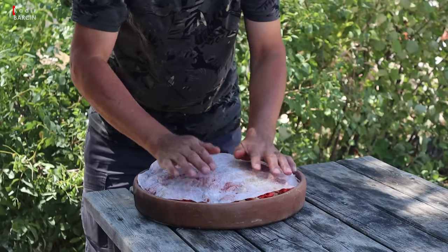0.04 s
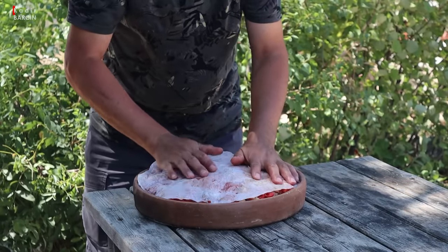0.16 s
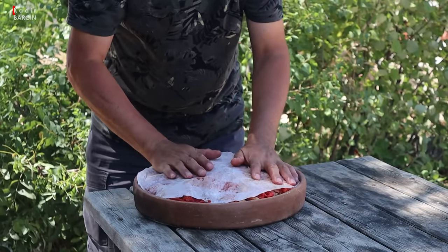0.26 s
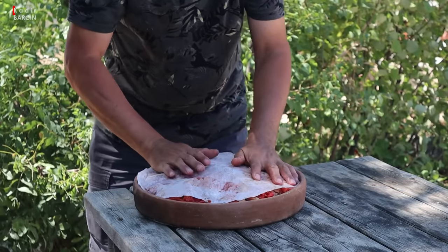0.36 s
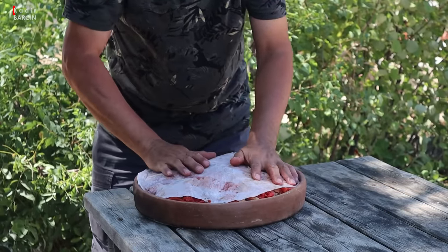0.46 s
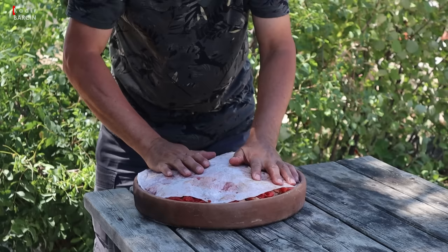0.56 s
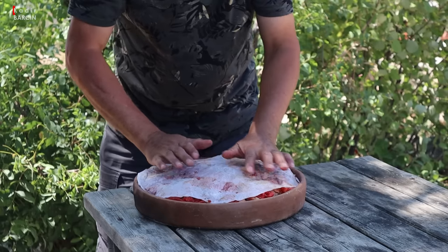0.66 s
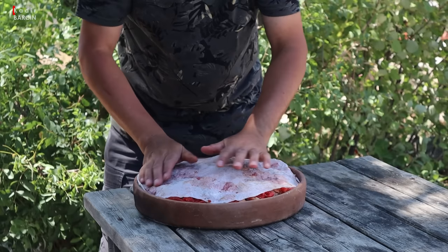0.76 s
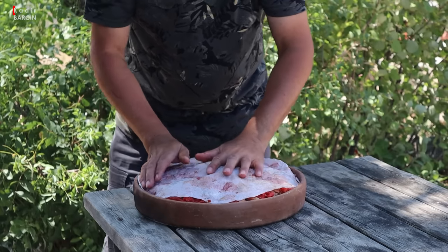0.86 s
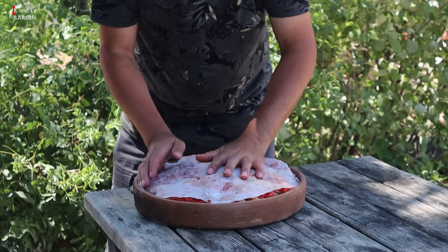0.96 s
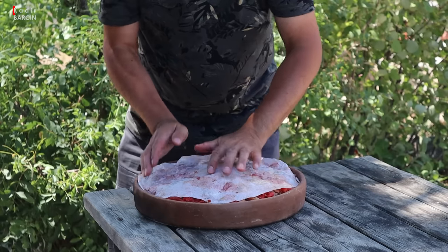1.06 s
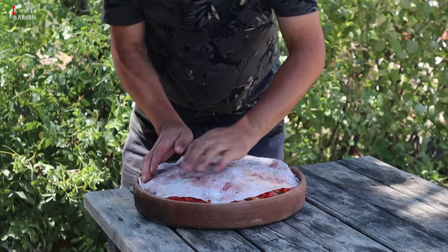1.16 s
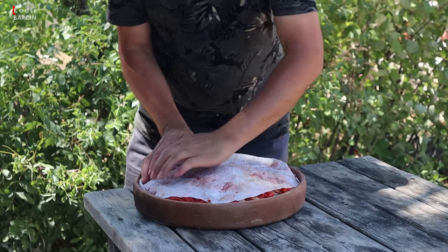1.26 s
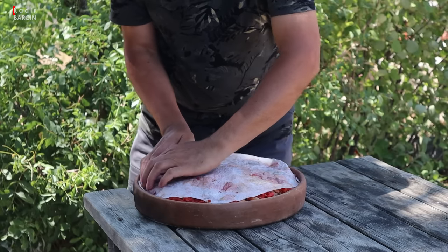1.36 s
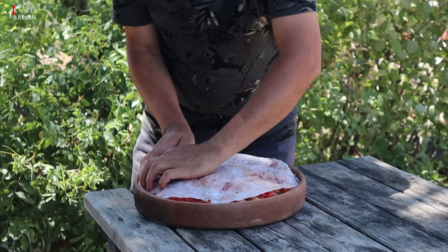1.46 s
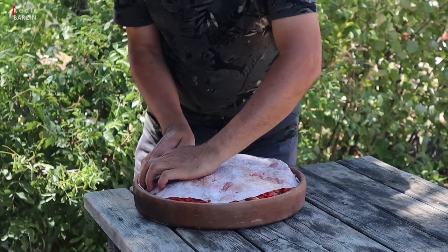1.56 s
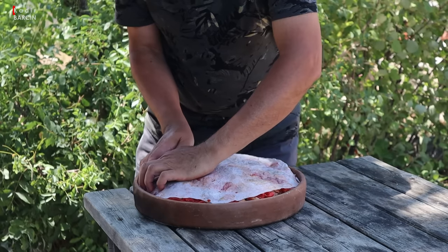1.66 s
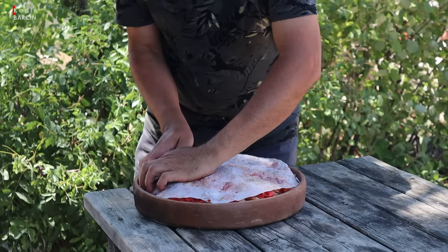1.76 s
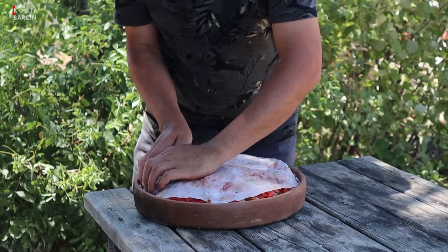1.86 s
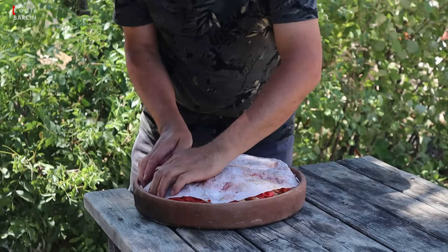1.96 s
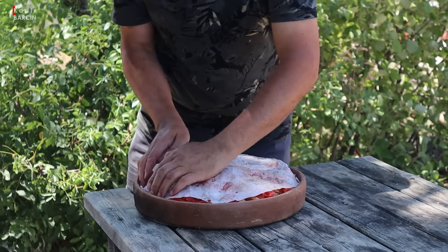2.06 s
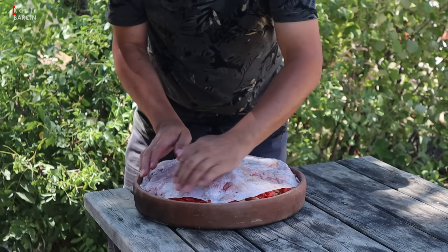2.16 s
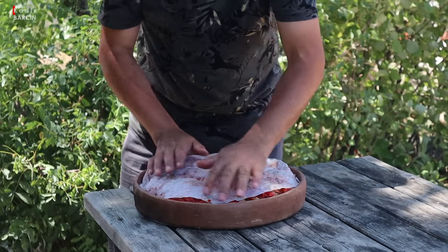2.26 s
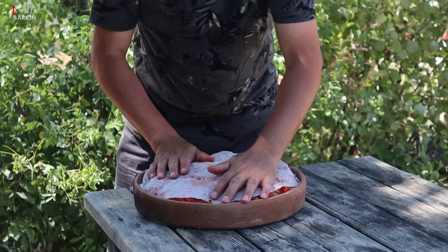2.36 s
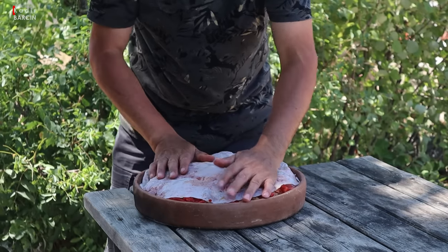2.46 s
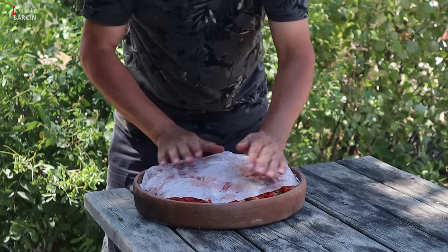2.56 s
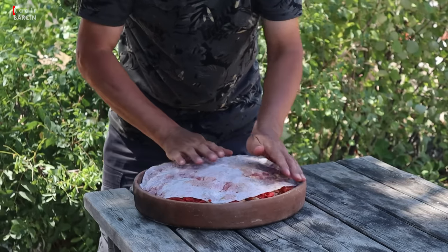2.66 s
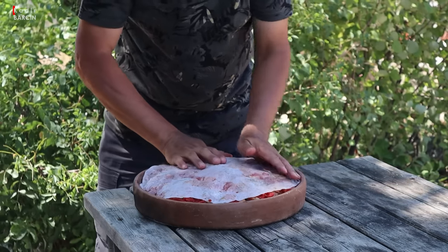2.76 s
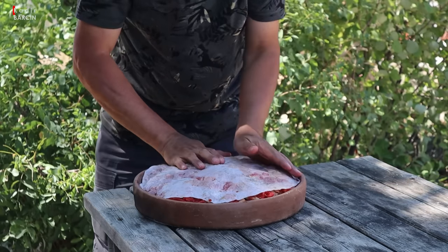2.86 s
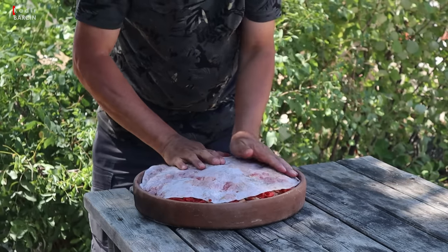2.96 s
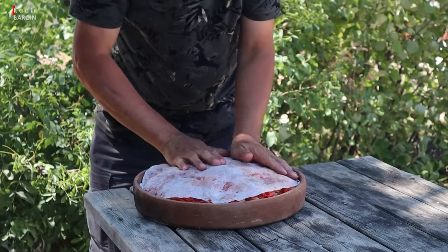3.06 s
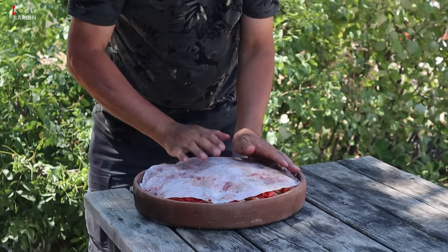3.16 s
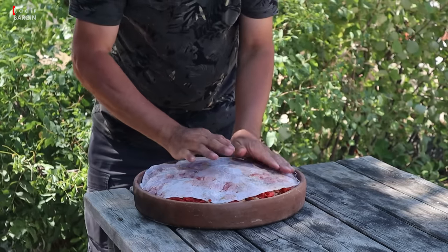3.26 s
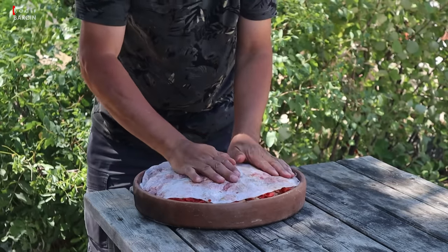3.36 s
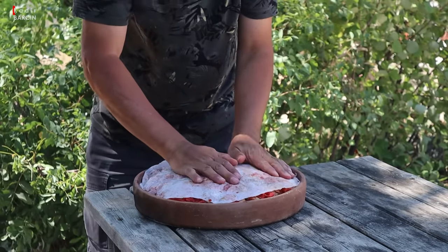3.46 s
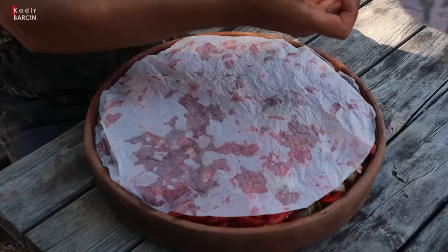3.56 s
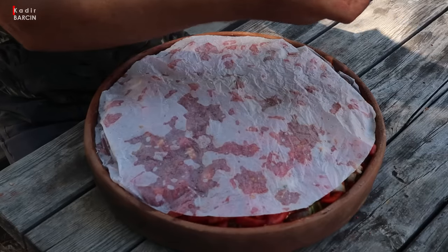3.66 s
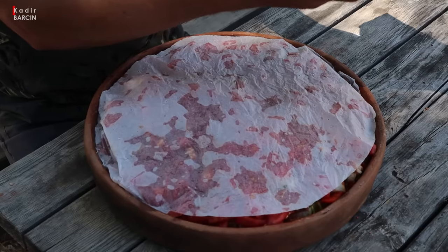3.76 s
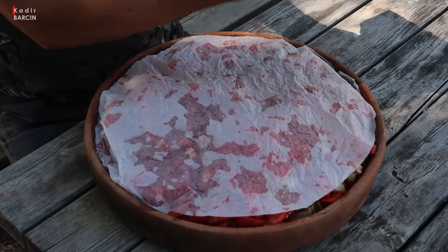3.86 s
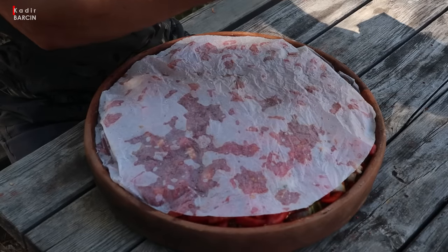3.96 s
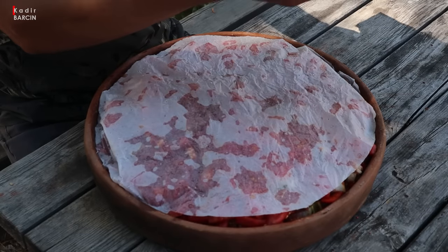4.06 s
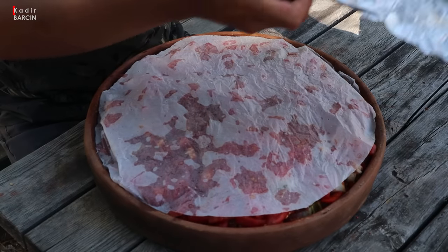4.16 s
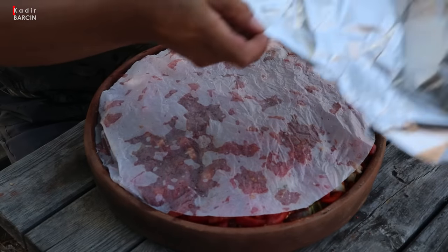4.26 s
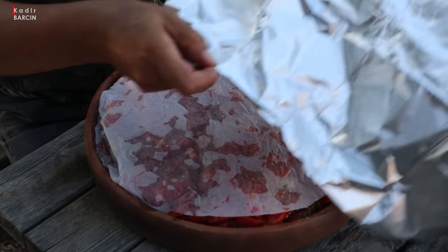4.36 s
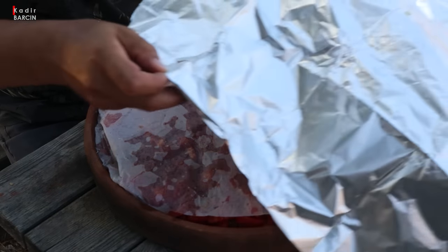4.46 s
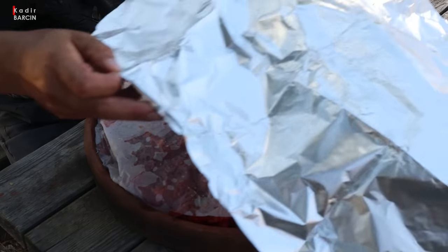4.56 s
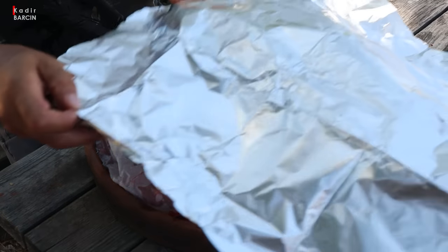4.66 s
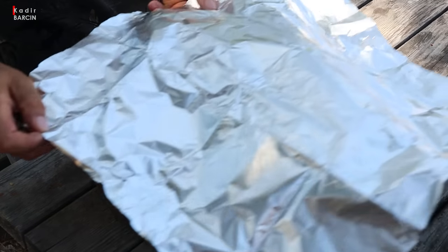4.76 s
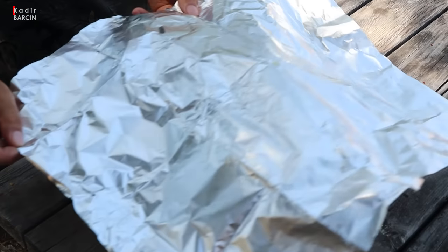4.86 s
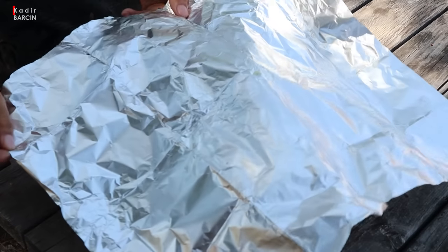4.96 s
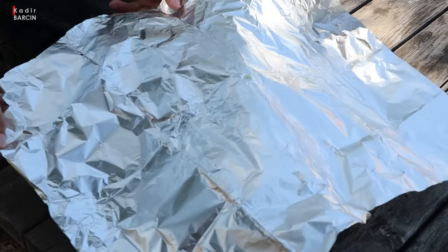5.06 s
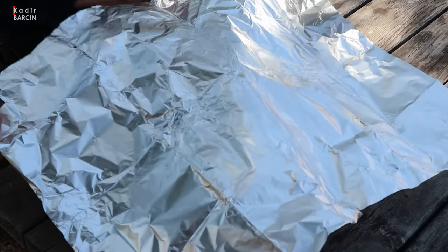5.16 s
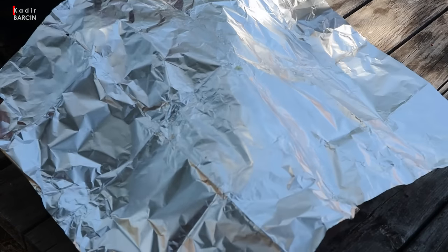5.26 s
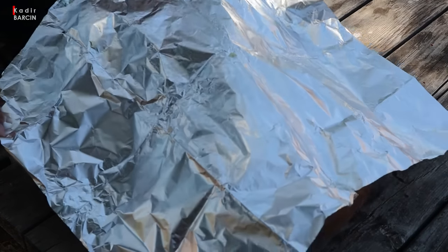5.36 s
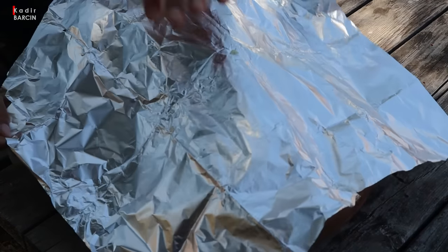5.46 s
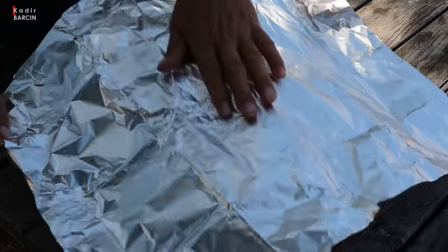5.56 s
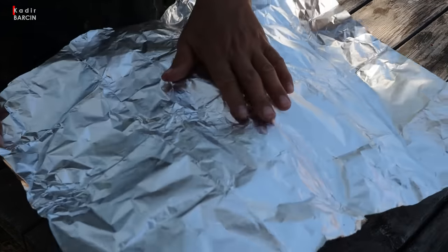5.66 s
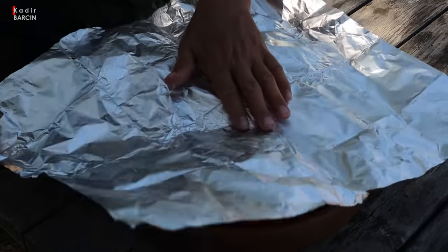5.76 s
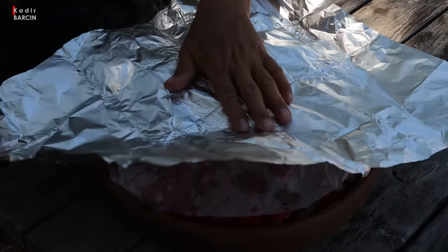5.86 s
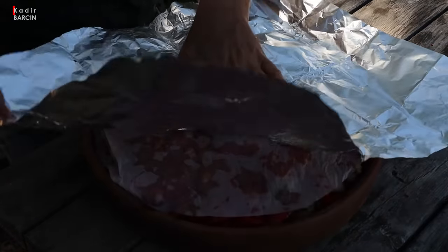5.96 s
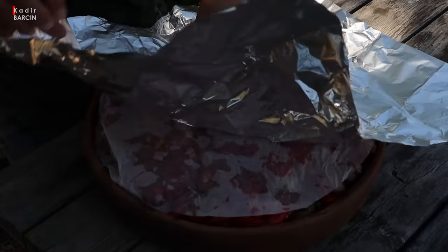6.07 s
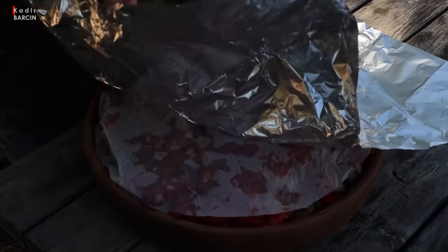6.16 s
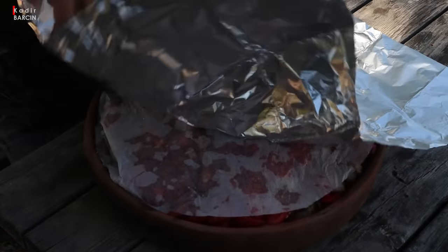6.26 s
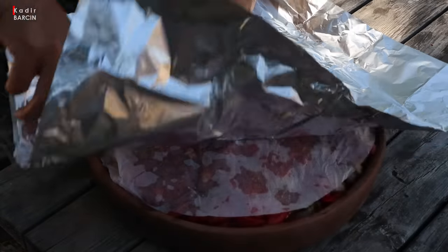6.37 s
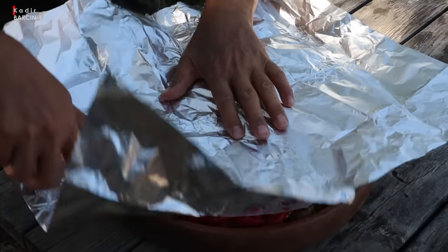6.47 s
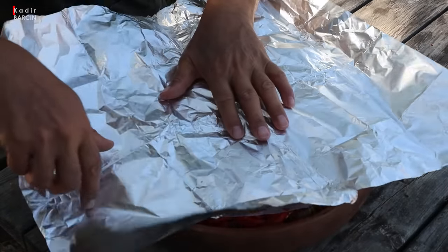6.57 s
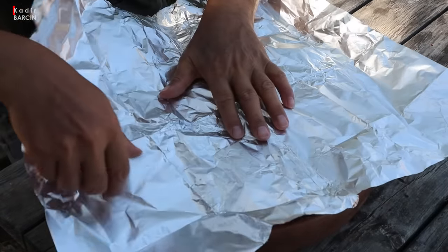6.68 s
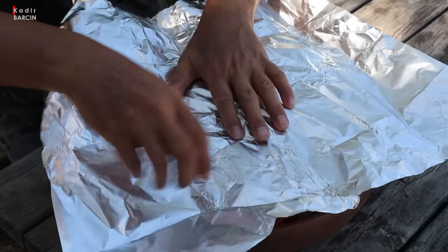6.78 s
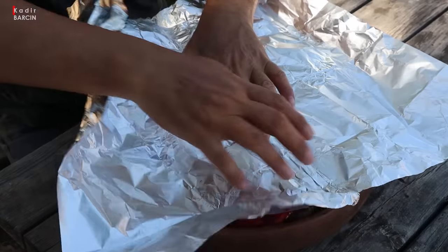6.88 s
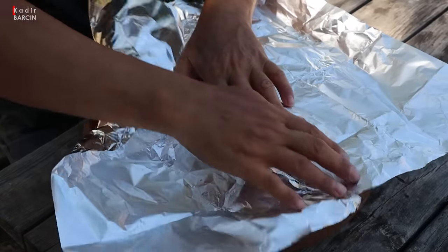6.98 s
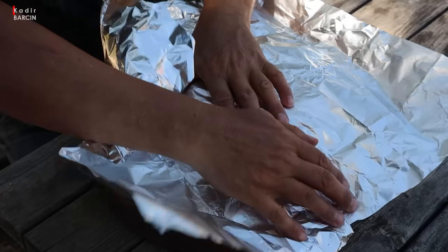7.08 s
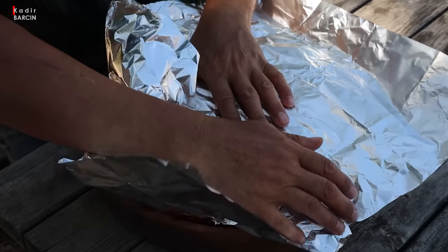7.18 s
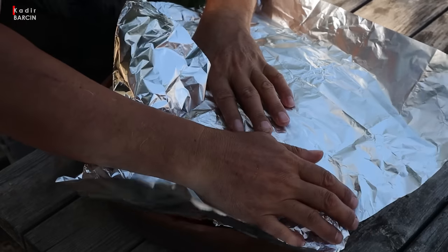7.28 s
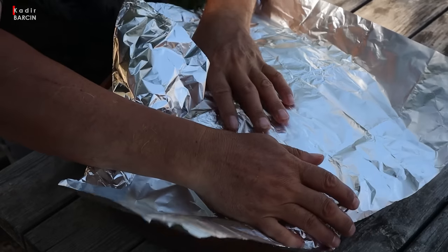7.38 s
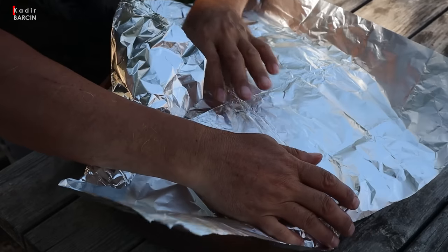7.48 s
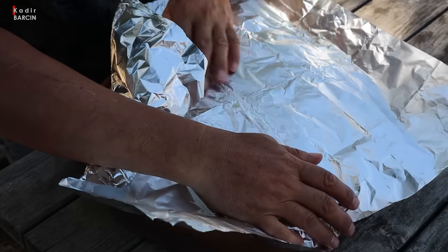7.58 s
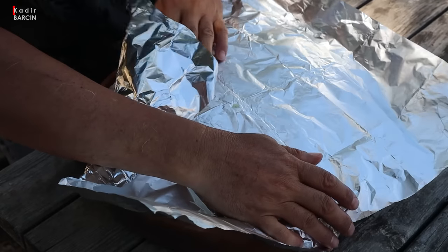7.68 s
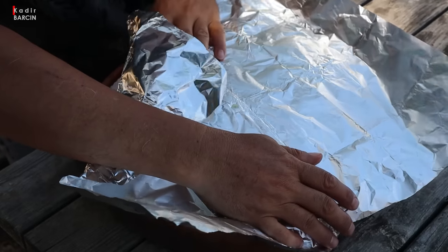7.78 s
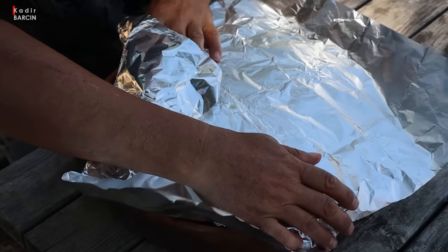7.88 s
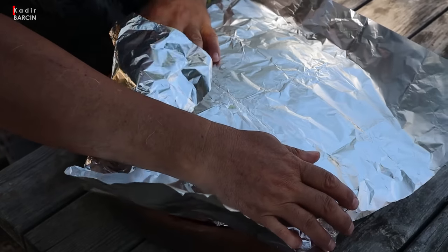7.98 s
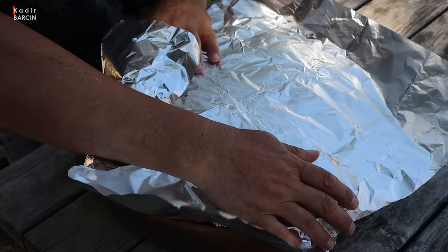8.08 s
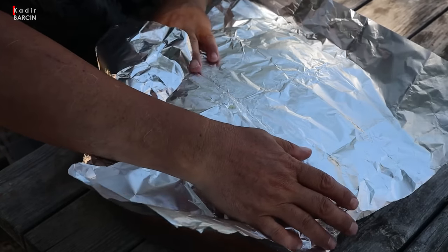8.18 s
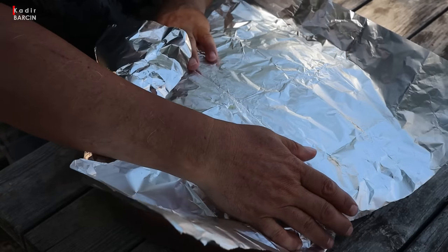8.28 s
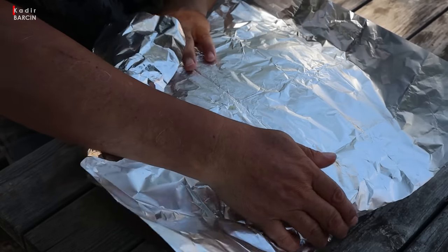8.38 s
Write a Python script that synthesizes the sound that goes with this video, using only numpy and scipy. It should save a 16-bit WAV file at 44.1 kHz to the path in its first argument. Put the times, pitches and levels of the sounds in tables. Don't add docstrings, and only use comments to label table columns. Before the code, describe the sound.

Outdoors in summer, hands pat damp paper on a clay dish with faint rustles and small ticks, while cicadas hiss and gusts thump the microphone. Abruptly the position is closer: the insect hiss jumps louder, and aluminium foil is shaken out with ringing, metallic flaps, then laid down and crumpled around the rim with sharp snaps, bright hissing creases and lower crackles.

```python
import sys
import numpy as np
from scipy import signal
from scipy.fft import rfft, irfft, next_fast_len
from scipy.io import wavfile
from scipy.ndimage import uniform_filter1d

SR = 44100
rng = np.random.default_rng(int(sys.argv[2]) if len(sys.argv) > 2 else 0)


def volts(x):
    e = np.asarray(x, float) / 20
    return 10 ** e


def store_pcm(level_fs):
    pcm = np.round(np.clip(level_fs, -1, 1) * 32767).astype(np.int16)
    wavfile.write(sys.argv[1], SR, np.atleast_2d(pcm).T)


N = 371763
TIME_S = np.arange(N) / SR
CUT_S = 3.601
FAR_VIEW = TIME_S < CUT_S


def curve(table):
    s, db = np.transpose(table)
    return np.interp(TIME_S, s, db)


def unit(x):
    return x / np.sqrt(np.mean(x ** 2))


def noise():
    return rng.standard_normal(N)


def colour(x, table, lo_hz=20, hi_hz=20000):
    size = next_fast_len(len(x))
    f = np.arange(size // 2 + 1) * SR / size + 1e-3
    hz, db = np.transpose(table)
    top_db = db[-1] if hz[-1] > 15000 else -90
    gain_db = np.interp(np.log(f), np.log(hz), db, left=-90, right=top_db)
    spectrum = rfft(x, size) * volts(gain_db)
    inside = 2 * np.sum(np.abs(spectrum[(f > lo_hz) & (f < hi_hz)]) ** 2)
    return irfft(spectrum, size)[:len(x)] * size / np.sqrt(inside)


def walk(rate_hz):
    k = int(SR / rate_hz)
    steps = np.repeat(rng.standard_normal(N // 20), k)[:N]
    return unit(uniform_filter1d(uniform_filter1d(steps, k), k))


def patchy(table, flicker_db, rate_hz, lo_hz=20, hi_hz=20000, count=6):
    total = 0
    for hz in np.geomspace(table[0][0], table[-1][0], count + 2):
        band = colour(noise(), [(hz / 2.2, -30), (hz, 0), (hz * 2.2, -30)])
        total = total + volts(flicker_db * walk(rate_hz)) * np.sqrt(hz) * band
    flat = colour(total, [(20, 0), (22000, 0)])
    return colour(flat, table, lo_hz, hi_hz)


def swells(s, db, rise_s, hold_s, fall_s, rest_db):
    step = 64
    t = np.arange(N // step + 1)[:, None] * step / SR
    rise = np.maximum(s - t, 0) / np.maximum(rise_s, 1e-3)
    fall = np.maximum(t - s - hold_s, 0) / fall_s
    power = np.sum(volts(2 * (db - 10 * (rise + fall))), axis=1)
    return 10 * np.log10(np.interp(np.arange(N), t[:, 0] * SR, power) + volts(2 * rest_db))


def crackle(rate_hz, spread_db, t60_s, bunch_db):
    starts = (rng.random(N) < 50 / SR) * rng.random(N)
    surge = signal.lfilter([1], [1, -np.exp(-1 / (.012 * SR))], starts)
    bunches = volts(bunch_db * np.minimum((surge - surge.mean()) / surge.std(), 1.5))
    sizes = volts(spread_db * np.minimum(rng.exponential(size=N), 3.8))
    clicks = (rng.random(N) < rate_hz / SR) * sizes
    power = signal.lfilter([1], [1, -volts(-120 / (t60_s * SR))], (clicks * bunches) ** 2)
    return np.sqrt(power) * noise()


def burst(hz, t60_s, octaves, grain):
    t = np.arange(len(grain)) / SR
    edges = np.clip(hz * 2 ** np.array([-octaves, octaves]), 50, 20000)
    band = signal.butter(2, edges, "band", fs=SR, output="sos")
    x = signal.sosfilt(band, grain * volts(-60 * t / t60_s))
    return x / np.max(np.abs(x))


def add(out, s, sound):
    i = int(s * SR)
    out[i:i + len(sound)] += sound[:N - i]


# f/Hz, density/dB [per Hz]
RUSTLE_SPECTRUM = [(88, -30), (150, -14.5), (400, 1.5), (540, -2), (680, 2.5), (1210, -16), (3210, -13),
                   (5200, 1)]
# f/Hz, level/dB
MACHINE_TONES = [(511.4, -72), (559.9, -54), (699.8, -59.5)]


def air():
    hum = 0
    for hz, db in MACHINE_TONES:
        sway_db, slip_rad = 1.7 * walk(5), 1.9 * walk(5)
        hum = hum + volts(db - 2.0 + sway_db) * np.sin(2 * np.pi * hz * TIME_S + slip_rad)
    return patchy(RUSTLE_SPECTRUM, 1.1, 9, 280, 2400) * volts(-51.0) + hum


# t/s, peak/dB, hold/s
GUSTS_ON_CAPSULE = [(0.0, -33, 0.25), (0.454, -39.5, 0.023), (0.618, -49, 0.17), (0.834, -38, 0.096),
                    (1.075, -33, 0.072), (1.3, -34.5, 0.062), (1.53, -38.5, 0.11), (1.72, -43.5, .08),
                    (1.973, -43, 0.11), (2.425, -44.5, 0.046), (2.672, -45, 0.15), (2.777, -40, 0.2),
                    (3.42, -42.5, .2)]
# t/s, level/dB
BREEZE_LEVEL = [
    (0, -63),
    (3.55, -60),
    (4.0, -53),
    (5.1, -56),
    (6.2, -56.5),
    (6.7, -64),
    (8.43, -65),
]


def wind():
    s, db, hold_s = np.transpose(GUSTS_ON_CAPSULE)
    gust_db = np.where(FAR_VIEW, swells(s, db, .081, hold_s, .072, -70), -90)
    flutter = walk(22.65)
    low = colour(noise(), [(15, -1.5), (35, 2.5), (80, -1.0), (130, -10.0)], 37.0, 86)
    upper = colour(noise(), [(90, -8.0), (125, 5.0), (200, -3.5), (400, -22.5)], 136, 260)
    breeze = volts(curve(BREEZE_LEVEL) + 2.3 * walk(5))
    eddies = volts(-49 + 1.26 * (gust_db + 40.5) + 1.3 * flutter) + volts(-62)
    return low * (volts(gust_db + 0.53 * flutter) + breeze) + upper * eddies


# t/s, level/dB
CHORUS_LEVELS = [
    [(0.0, -30.5), (1.05, -30.5), (1.48, -31.5), (3.58, -33)],
    [(3.62, -19.5), (3.78, -21.5), (7.05, -21.5), (8.43, -23)],
]
# f/Hz, density/dB [per Hz]
FAR_SPECTRUM = [(1760, -92), (3770, -24.5), (4090, -15), (4500, -9), (6490, -3.5), (8150, -5.5),
                (9420, -19), (15600, -58)]
CLOSE_SPECTRUM = [(3200, -16), (4250, -3.5), (4580, 2.5), (4950, 0), (6500, 7), (8600, -2), (10500, -13.5),
                  (15750, -23)]
# t/s, level/dB
THROB_LEVEL = [
    (0, -28.5),
    (1.2, -29),
    (1.45, -34),
    (1.7, -30.5),
    (2.5, -36),
    (3.58, -35),
]


def cicada_chorus():
    far = patchy(FAR_SPECTRUM, 0.82, 8.65, 5500, 6960, count=9)
    close = patchy(CLOSE_SPECTRUM, 1.42, 11, 3900, 9000, count=9)
    before, after = CHORUS_LEVELS
    level_db = np.where(FAR_VIEW, curve(before), curve(after))
    level_db = curve(np.vstack([before, after])) if len(before) else level_db
    chorus = np.where(FAR_VIEW, far, close) * volts(level_db + 0.08)
    throb_hz = 5.45
    throb = (.5 + .5 * np.cos(2 * np.pi * throb_hz * (TIME_S - .055))) ** 1.3
    throbber = colour(noise(), [(4900, -20), (5500, 0), (5900, -2), (7600, -5), (8600, -16)])
    return chorus + FAR_VIEW * throbber * throb * volts(curve(THROB_LEVEL))


# t/s, level/dB
SINGER_LEVEL = [
    (0, -41.5),
    (1.055, -40.5),
    (1.068, -53),
    (1.145, -54),
    (1.155, -46),
    (1.27, -44),
    (2.3, -44.5),
    (3.58, -42),
]
# f/Hz, density/dB [per Hz]
SINGER_SPECTRUM = [(5180, -38), (8800, -9.5), (10000, -7.5), (11200, -10.5), (11600, -11), (12900, -17.5),
                   (13700, -24), (15600, -30)]
# delay/ms, share [ratio]
SINGER_ECHOES = [(1.4, .4), (3.1, .22), (3.63, .18), (7.3, .2), (7.6, .5)]
# t/s, level/dB
BELLY_LEVEL = [
    (0, -70),
    (1.22, -70),
    (1.3, -37.5),
    (2.1, -39),
    (3.58, -41.5),
]


def near_cicada():
    buckle_hz = 186.4
    phase = np.cumsum(buckle_hz * (1 + 0.0034 * walk(8.1))) / SR % 1
    ribs = noise() * (.7 + np.exp(-phase / .3))
    heard = ribs.copy()
    for delay_ms, share in SINGER_ECHOES:
        heard += share * np.roll(ribs, round(delay_ms * SR / 1000))
    belly_ms, belly_feedback = .726, .78
    comb = np.r_[1, np.zeros(round(belly_ms * SR / 1000) - 1), -belly_feedback]
    hollow = signal.lfilter([1], comb, heard)
    singer = colour(heard, SINGER_SPECTRUM, 9970, 10780) * volts(curve(SINGER_LEVEL) + 4.5)
    belly = colour(hollow, [(9200, -25), (9500, 1), (11150, 0), (11300, -9), (12600, -9), (13300, -25)])
    return FAR_VIEW * (singer + belly * volts(curve(BELLY_LEVEL)))


# f/Hz, density/dB [per Hz]
PAPER_SPECTRUM = [(400, -17), (900, -3), (1600, 1), (3000, 3), (6000, -1.5), (15000, -10)]
# t/s, peak/dB, hold/s
PALM_STROKES = [(0.0, -53, 0.05), (0.2, -47, 0.12), (0.456, -57, 0.2), (0.862, -42, 0.0074),
                (0.907, -41.5, 0.14), (1.074, -40, 0.0051), (1.247, -41, 0.03), (1.381, -40.5, .0),
                (1.505, -56, 0.13), (1.693, -43.5, 0.034), (1.856, -46, 0.027), (2.046, -39.5, 0.017),
                (2.15, -54, 0.033), (2.38, -48.5, 0.11), (2.785, -46.5, 0.05), (2.897, -50, 0.065),
                (3.08, -40.5, 0.0066), (3.225, -47.5, 0), (3.392, -45, 0.0045), (3.45, -48.5, 0.1)]
# t/s, peak/dB, f/Hz
PAPER_TICKS = [(0.0533, -41, 1260), (0.2004, -28, 3330), (0.2488, -39, 2290), (0.3192, -34, 3250),
               (0.4988, -35, 2560), (0.5641, -36, 2440), (0.6424, -41, 1410), (0.6898, -33, 2480),
               (0.8609, -27, 1670), (0.8824, -30, 2400), (0.902, -27, 2410), (0.9727, -38, 2660),
               (1.0026, -26, 2070), (1.069, -27.5, 1730), (1.2447, -26, 2800), (1.3124, -28.5, 2710),
               (1.477, -27, 2310), (1.6217, -37, 2820), (1.694, -24, 3660), (1.8796, -37, 2680),
               (2.0376, -26, 2330), (2.1097, -38, 1060), (2.3496, -42, 2570), (2.397, -30, 3330),
               (2.4553, -33, 1900), (2.7816, -35, 3770), (2.8255, -29, 1250), (2.8779, -26.5, 1430),
               (3.0854, -35, 1920), (3.1707, -33, 2920), (3.2221, -32, 3490), (3.3882, -39, 1390),
               (3.4598, -30, 1480), (3.5064, -33, 3030), (3.5294, -37.5, 3420)]
# t/s, peak/dB
EDGE_TICKS = [
    (0.2952, -37),
    (0.3346, -54),
    (1.275, -35),
    (1.3803, -22),
    (2.7896, -33),
    (2.8205, -35),
    (3.2216, -34),
    (3.5289, -26),
]


def paper():
    s, db, hold_s = np.transpose(PALM_STROKES)
    slide_db = swells(s, db, .016, hold_s, .024, -51.5)
    out = colour(crackle(1600, 3, .010, 1.3), PAPER_SPECTRUM, 900, 4700) * volts(slide_db + 1.0)
    out *= FAR_VIEW
    for s, db, hz in PAPER_TICKS:
        grain = rng.standard_normal((2, 1500))
        tick = burst(hz, .026, .42, grain[0]) + volts(-6) * burst(2800, .012, .8, grain[1])
        add(out, s, volts(db - 0.5) * tick)
    for s, db in EDGE_TICKS:
        add(out, s, volts(db + 1.5) * burst(13500, .012, .3, rng.standard_normal(800)))
    return out


def flap(modes):
    t = np.arange(SR // 3) / SR
    bend = t * (1 + 0.0016 * np.sin(2 * np.pi * (9 * t + rng.random())))
    parts = [(hz, db, t60_s, 0) for hz, db, t60_s in modes]
    for a, b, c, d in rng.random((40, 4)):
        parts.append((480 * 9.6 ** a, -3 - 8 * b - 2 * a, .07 + .16 * c, .03 * d ** 3))
    ring = np.zeros(len(t))
    for hz, db, t60_s, late_s in parts:
        since = np.maximum(t - late_s, 0)
        decay = volts(db - 60 * since / min(t60_s, .45))
        ring += decay * np.minimum(since / 0.0035, 1) * np.sin(2 * np.pi * hz * bend)
    ring *= 1 + .3 * np.sin(2 * np.pi * (23 * t + rng.random()))
    thump = burst(245, 0.13, 0.94, rng.standard_normal(len(t)))
    return volts(-11.0) * ring + volts(-16.0) * thump


# t/s, peak/dB
FLAP_TIMES = [
    (4.235, -15.5),
    (4.304, -7),
    (4.368, -5.5),
    (4.442, -14),
    (4.492, -5.5),
    (4.628, -11),
    (4.651, -7.5),
]
# f/Hz, level/dB, t60/s
MODES_1 = [(3666, 3, 0.25), (3273, 1, .1), (2568, -3, .15), (4452, -4, .06)]
MODES_2 = [(1710, 5, 0.18), (1350, 2.5, 0.16), (2220, -4, 0.2), (2950, -1, 0.18), (4300, 5, 0.1)]
MODES_3 = [(1430, 10, 0.071), (1530, 8, 0.11), (2080, -3, 0.31), (2740, 6, 0.069), (1100, -9, 0.45),
           (3570, -6, .45)]
MODES_4 = [(1346, 4, 1.2), (940, -3, .2)]
MODES_5 = [(640, 0, 0.11), (1100, -3, 0.15), (1349, 1.5, 1.1), (1680, 2, 0.3), (2239, -3, .19),
           (2562, -6, .25), (3262, -4, .2)]
MODES_6 = [(2800, -2, 0.25), (3570, 5, .35)]
MODES_7 = [(925, -6, 0.22), (1350, -1.5, 0.31), (1870, -5, .17), (2137, 1.5, .36), (2800, -3, 0.13),
           (3570, -6, 0.24)]


def foil_flaps():
    out = np.zeros(N)
    shapes = (MODES_1, MODES_2, MODES_3, MODES_4, MODES_5, MODES_6, MODES_7)
    for (s, db), modes in zip(FLAP_TIMES, shapes):
        add(out, s, volts(db) * flap(modes))
    return out


# t/s, peak/dB, treble over it/dB, f/Hz
FOIL_SNAPS = [(3.64, -10, 0, 3340), (4.102, -9, -8, 2440), (4.237, -1.5, -15, 3530),
              (4.305, -5.5, -23, 1660), (4.369, -4, -25, 1470), (4.494, -14, 0, 1610),
              (4.629, -2, -12, 1520), (4.647, 2, -26, 2100), (5.047, -14, -6, 1830), (5.177, -4, -8, 3270),
              (5.613, -17, -2.5, 3280), (5.773, -14, -8, 2600), (5.815, -13, 5, 3030),
              (5.895, -8, -16, 2460), (6.191, -12.5, 3, 1430), (6.251, -12, 1, 3140), (6.359, -22, 6, 1660),
              (6.397, -13, 12, 1350), (6.522, -4, -4, 3350), (6.566, -1, 0.5, 3300),
              (7.167, -6.5, -18, 1430), (7.369, -12, -16, 2520), (7.441, -2.5, -5, 1870),
              (7.484, -6, -19, 2030), (7.727, -13, -1, 2150), (8.115, -4, 6, 1740), (8.205, -15, -7, 2650),
              (8.246, -9, -3, 1660), (8.395, -5, -13, 2150)]
# t/s, peak/dB
FOIL_RIPS = [(3.6198, -10), (3.6842, -12), (3.7181, -16), (3.7919, -17), (3.9491, -13), (4.0488, -23),
             (4.0703, -11), (4.2449, -27), (4.3112, -24), (4.405, -22), (4.4499, -7), (4.4928, -17),
             (4.5667, -11), (4.5881, -14), (4.7203, -10), (4.7433, -9), (4.8141, -14), (4.87, -11),
             (4.9877, -9), (5.0421, -14), (5.1533, -16), (5.1773, -14), (5.2411, -16), (5.5604, -20),
             (5.6128, -10), (5.743, -19), (5.7599, -13), (5.8862, -15), (5.9141, -16), (6.0343, -13),
             (6.2493, -25), (6.3296, -22), (6.3411, -8), (6.3606, -1), (6.5057, -7), (6.7866, -14),
             (6.825, -8.5), (6.9747, -6), (7.0086, -14), (7.037, -21), (7.2745, -17), (7.3099, -14),
             (7.3279, -15), (7.4406, -15), (7.6771, -16), (7.6911, -20), (7.8013, -10), (7.8372, -20),
             (7.8562, -17), (7.8741, -9), (7.916, -16), (7.9574, -18), (8.0896, -16), (8.1146, -12),
             (8.2059, -18), (8.2393, -20), (8.2927, -18), (8.3994, -19)]
# t/s, peak/dB, f/Hz
FOIL_CLICKS = [(3.856, -1, 6950), (4.215, -10, 6800), (4.871, -14, 7500), (5.022, -12, 6100),
               (5.242, -7, 6700), (6.141, -18, 7500), (6.250, -2, 6900), (6.766, -18, 6800),
               (7.106, -4, 4500), (7.177, -8, 5000), (7.33, -1, 7200), (7.357, -4, 3500),
               (7.369, -10, 2500), (7.398, -11, 6000), (7.44, -9, 4500), (7.484, -13, 2500),
               (7.679, -10, 6300), (7.916, -12, 6800), (8.207, -12, 3000), (8.389, -8, 5000),
               (8.409, -12, 6900)]


def foil_snaps():
    out = np.zeros(N)
    onset = np.minimum(np.arange(3000) / 25, 1)
    for s, db, treble_db, hz in FOIL_SNAPS:
        grain = rng.standard_normal((2, 3000)) * onset
        knock_t60_s = .028 if s < 7 else .016
        crack_t60_s = .035 if s < 7 or 8 < s < 8.2 else .012
        add(out, s, volts(db - 6.0) * burst(hz, knock_t60_s, .5, grain[0]))
        add(out, s, volts(db + treble_db - 1) * burst(9000, crack_t60_s, .85, grain[1]))
    for s, db in FOIL_RIPS:
        add(out, s, volts(db - 1) * burst(14000, .07, 1.0, rng.standard_normal(3000) * onset))
    for s, db, hz in FOIL_CLICKS:
        add(out, s, volts(db - 0.5) * burst(hz, .004, .9, rng.standard_normal(400)))
    return out


# t/s, small creases/dB, large folds over them/dB, build-up/s [per 10 dB]
SHAKES = [(3.61, -51, -11, 19), (3.69, -30, -2.5, 0.3), (3.965, -29, -2, 0.12), (4.07, -39, 8, -0.4),
          (4.13, -44, 4, -1.5), (4.24, -27.5, -3, -0.02), (4.308, -31, 19.5, 0.04),
          (4.372, -32.5, 12.5, 0.11), (4.455, -40, -9, 0.8), (4.496, -27.5, 13.5, 0.12),
          (4.58, -32, -17, -2.5), (4.632, -42, 15, 0.2), (4.652, -37.5, 19, 0.24), (4.68, -38.5, 17, 0.12),
          (4.753, -28.5, -15, -0.33), (4.87, -35.5, -1, -0.05)]
PRESSES = [(4.99, -34, 3.5, 0.07), (5.073, -23.5, -1, 0.043), (5.182, -24.5, -3.5, 0.033),
           (5.42, -31.5, -4, 0.13), (5.571, -27, 0, 0.027), (5.615, -22, -3, 0.0068),
           (5.64, -23.5, -7, 0.046), (5.665, -27, -11, 0.018), (5.763, -26, 1, 0.0051),
           (5.79, -27.5, -7, 0.026), (5.84, -25.5, -8, 0.084), (5.935, -23.5, -9, 0.052),
           (6.101, -24.5, -4, 0.072), (6.145, -27.5, -8, 0.056), (6.254, -33.5, -4, 0.023),
           (6.36, -19, -5, 0.0076), (6.428, -20, -5, 0.047), (6.53, -21, -5, 0.054),
           (6.575, -24.5, -7, 0.05), (6.8, -30, -7, 0.67), (6.98, -29, -12, 0.01),
           (7.17, -26.5, -6.5, 0.23), (7.28, -29, -2.5, 0.31), (7.35, -26.5, 0, 0.04),
           (7.49, -29.5, -3.5, 0.11), (7.71, -29, 1, 0.054), (7.84, -31.5, -2, .1), (8.0, -29.5, 2, 0.27),
           (8.116, -23.5, -6, 0.024), (8.247, -33, 2, 0.023), (8.333, -33.5, -4, 0.14),
           (8.399, -37, -2, 0.022)]
# t/s, wobble/dB
SHEET_SHOVES = [
    (3.65, -40),
    (3.965, -39),
    (5.637, -43),
    (6.098, -43),
    (6.254, -38.5),
    (6.364, -29),
    (7.365, -51),
    (7.724, -42),
    (8.12, -39),
    (8.247, -41.5),
]
# f/Hz, density/dB [per Hz]
CREASE_SPECTRUM = [(2500, -10.5), (3500, -4), (5000, -3), (7500, 4.5), (9000, 4.5), (10300, -6),
                   (13500, 0.5), (15750, -8)]
FOLD_SPECTRUM = [(450, -16), (850, -4.5), (1400, -0.5), (2200, 0.5), (3400, -7.5), (5000, -10.5)]
WOBBLE_SPECTRUM = [(80, -27), (160, -8.5), (350, 2), (600, -1), (900, -12), (1300, -77)]


def foil_crumple():
    s, db, size_db, rise_s = np.transpose(list(SHAKES) + list(PRESSES))
    crease_db = swells(s, db, rise_s, 0, .038, -48.5)
    fold_db = swells(s, db + size_db, rise_s, 0, .069, -39)
    s, db = np.transpose(SHEET_SHOVES)
    shove_db = swells(s, db, .015, 0, .038, -74)
    sway = np.hypot(volts(-47.5 + 1.64 * (np.minimum(fold_db, -25) + 30)), volts(shove_db))
    small = unit(crackle(3500, 2.8, .005, .9))
    large = unit(crackle(1000, 3.2, .010, 1.1))
    slack = unit(crackle(300, 2.7, .06, 1.5))
    crease = colour(small + 0.82 * large, CREASE_SPECTRUM, 9430, 14800) * volts(crease_db + 2.5)
    fold = colour(large + 1.14 * small, FOLD_SPECTRUM, 990, 3020) * volts(fold_db + 0.5)
    fold *= volts(curve([(4.2, 0), (4.3, -8.5), (4.7, -8.5), (4.78, 0)]))
    wobble = colour(large + 1.14 * slack, WOBBLE_SPECTRUM, 150, 864) * sway * volts(0.8)
    return (crease + fold + wobble) * ~FAR_VIEW


def scene():
    background = air() + wind() + cicada_chorus() + near_cicada()
    foil = foil_flaps() + foil_snaps() + foil_crumple()
    return np.tile(background + paper() + foil, (2, 1))


def band_limit(x):
    return signal.sosfilt(signal.butter(12, 15730, fs=SR, output="sos"), x)


def record(dry):
    top = signal.ellip(12, .1, 90, 15760, fs=SR, output="sos")
    mix = signal.sosfilt(top, np.tanh(1.009 * dry) / 1.353)
    return band_limit(mix)


dry = scene()
out = record(dry)
store_pcm(out)
```